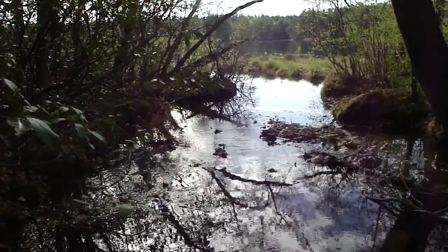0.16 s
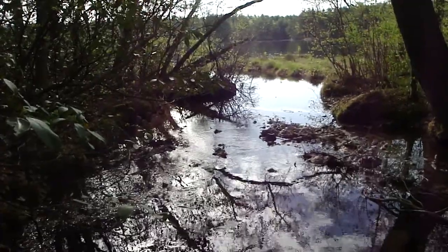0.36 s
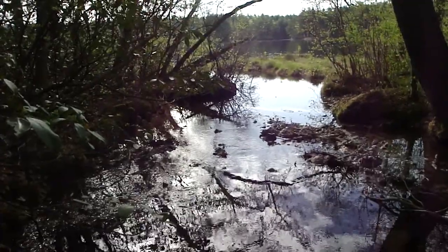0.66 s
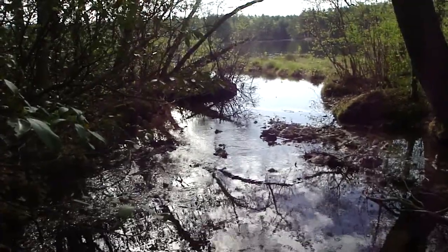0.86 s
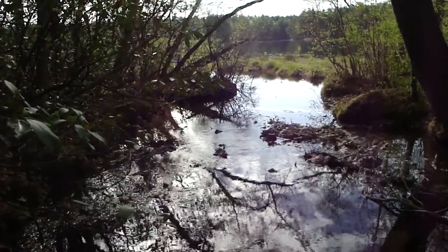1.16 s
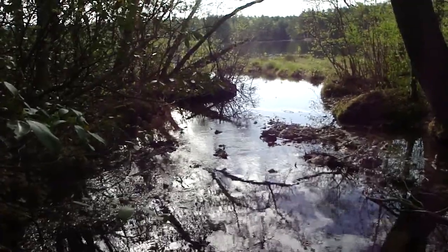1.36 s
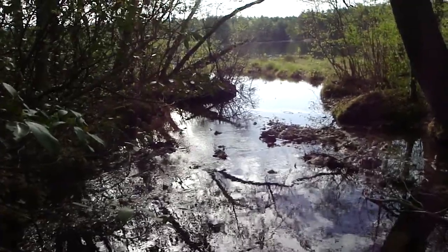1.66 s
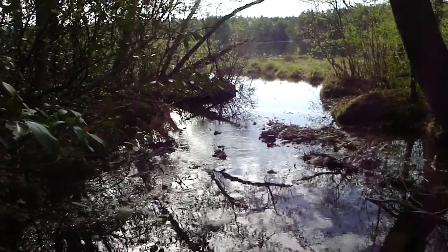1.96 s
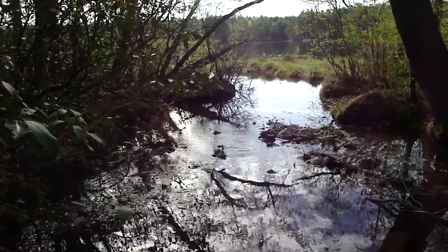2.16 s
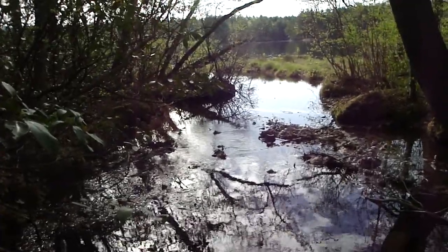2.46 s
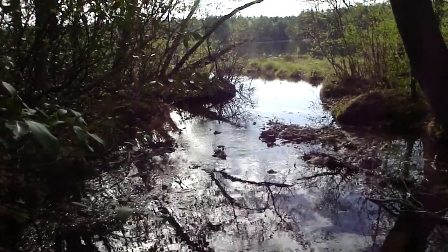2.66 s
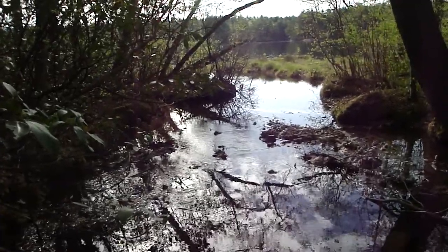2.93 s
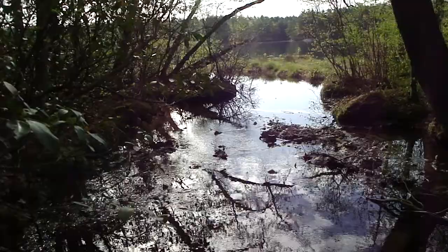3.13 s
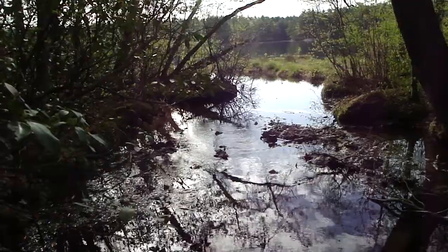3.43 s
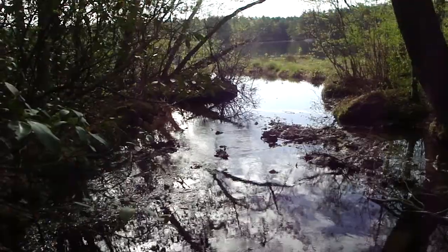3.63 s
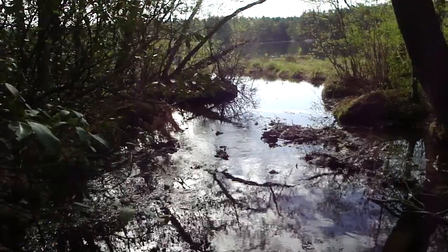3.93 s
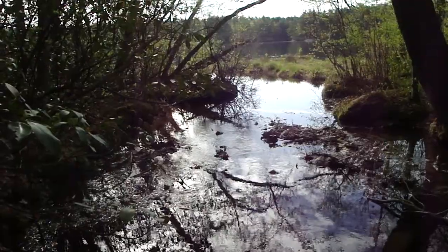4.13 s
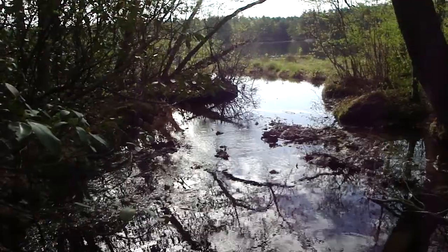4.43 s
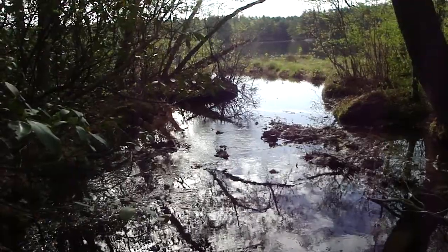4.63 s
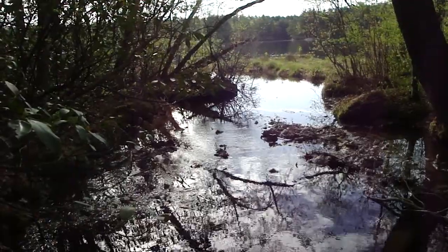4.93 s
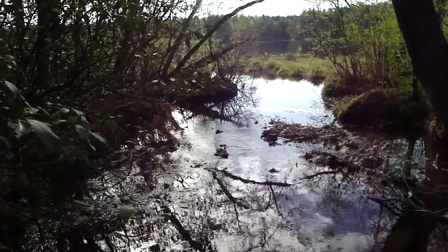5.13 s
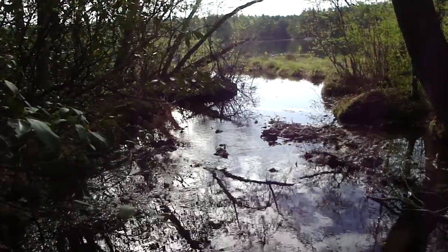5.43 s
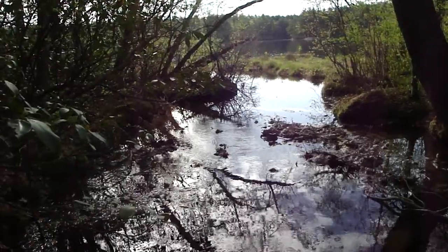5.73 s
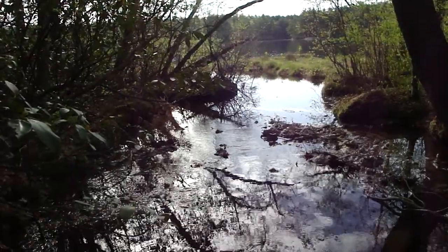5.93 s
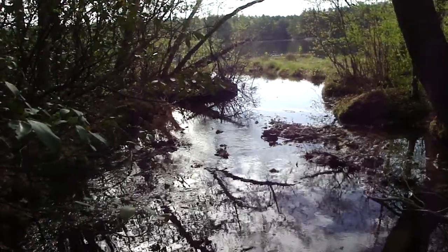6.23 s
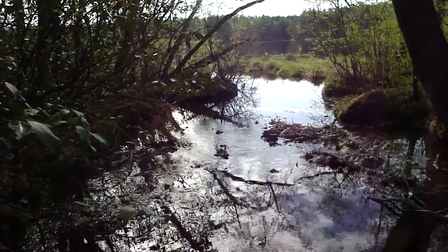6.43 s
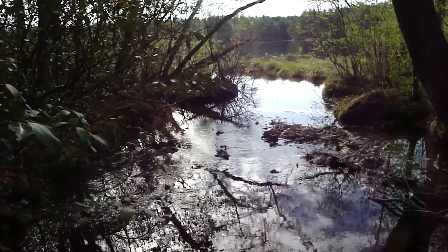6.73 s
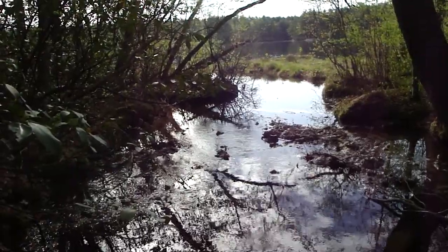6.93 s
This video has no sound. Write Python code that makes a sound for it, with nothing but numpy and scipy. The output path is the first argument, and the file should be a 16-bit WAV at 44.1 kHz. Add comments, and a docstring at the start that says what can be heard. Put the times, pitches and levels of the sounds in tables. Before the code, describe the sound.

A chorus of tree frogs trills continuously around a wooded pond, many overlapping fast pulsing notes blurred by trees. Beneath is a soft airy rush with hiss and faint camera ticks. Distant small birds chirp, buzz and whistle downward, with one raspy song around two seconds. After five seconds the deeper frogs fall away, then the middle ones thin, leaving the high trill. Single fixed camera microphone, mono.

```python
"""Tree frogs trill around a wooded pond from the start, each pulsing one note that the trees smear.
Under them lie a soft outdoor rush with hiss and the camera's faint electrical ticks and whine, all by filtering.
From one second small birds further off whistle and buzz on gliding sines; at two seconds one sings a raspy song.
After five seconds the deep frogs all but drop out, then the middle ones thin; the high ones trill on."""
import sys
import numpy as np
from scipy import signal
from scipy.fft import rfft, irfft, next_fast_len
from scipy.io import wavfile

SR = 44100
rng = np.random.default_rng(int(sys.argv[2]) if len(sys.argv) > 2 else 0)


def generate_wav(sig):
    """Save sig (samples, or channels by samples) to the path in sys.argv[1] as 16-bit PCM at SR."""
    pcm = np.round(np.clip(np.atleast_2d(sig).T, -1, 1) * 32767).astype(np.int16)
    wavfile.write(sys.argv[1], SR, pcm)


N = 312669
T = np.arange(N) / SR
WOODS_T60 = 1.2  # time for a bird's note to fade by 60 dB among the trees [s]


def undb(db):
    """Decibels to gain."""
    return 10 ** (np.asarray(db) / 20)


def unit(x):
    """Scale to rms 1."""
    return x / np.sqrt(np.mean(x ** 2) + 1e-20)


def walk(rate):
    """Slow chance: rate random levels a second joined by lines, spread near 1."""
    levels = rng.standard_normal(8192)
    return 1.2 * np.interp(T * rate, np.arange(8192), levels)


def ramp(start, length):
    """Rise from 0 to 1 over length seconds."""
    return np.clip((T - start) / length, 0, 1)


def tone(hz):
    """A sine that follows a pitch curve."""
    return np.sin(2 * np.pi * np.cumsum(hz) / SR)


def colour(x, points):
    """Filter by a spectrum of (Hz, dB) points, joined along a logarithmic pitch axis."""
    hz, db = np.transpose(points)
    size = next_fast_len(N)
    f = np.maximum(np.arange(size // 2 + 1) * SR / size, 1)
    gain = undb(np.interp(np.log(f), np.log(hz), db))
    return irfft(rfft(x, size) * gain, size)[:N]


def woods(x, t60, wet_db):
    """The direct sound and a fading spray of echoes from trunks and banks."""
    t = T[:SR]
    after_gap = t > .008
    spray = rng.standard_normal(SR) * undb(-60 * t / t60) * after_gap
    echoes = undb(wet_db) * unit(spray) / np.sqrt(SR)
    return x + signal.oaconvolve(x, echoes)[:N]


def add(out, start, sound):
    """Mix a short sound in at its time."""
    i = max(int(start * SR), 0)
    out[i:i + len(sound)] += sound[:N - i]


def air():
    """A soft, far rush that swells very slightly, topped by smooth hiss: filtered noise."""
    # outdoor rush and microphone hiss, relative spectrum: (frequency [Hz], level per Hz [dB])
    air_spectrum = [(20, -18), (38, -28), (58, -8.5), (75, -2.5), (105, 0), (250, -1.5), (420, -1.2),
                    (800, -4.5), (1300, -6.5), (2100, -10), (4000, -13.5), (7000, -17.5), (11000, -21)]
    level_db = -53
    rush = unit(colour(rng.standard_normal(N), air_spectrum))
    swell_db = .15 * walk(2)
    return undb(level_db + swell_db) * rush


def trill(hz, rate, wet_db, pulse_share=0.53, attack=0.53, bend_hz=12, waver_hz=5.513, t60=0.48):
    """One frog: the vocal sac holds a note in quick pulses that start sharply and sag a little in pitch."""
    pulse_rate = rate * (1 + 0.02515 * walk(5))
    cycle = (np.cumsum(pulse_rate) / SR + rng.random()) % 1
    # progress through the sounding part of each cycle; the rest is silent
    within = np.minimum(cycle / pulse_share, 1)
    pulse = np.sin(np.pi * within ** attack) * undb(0.98 * walk(23))
    sag = bend_hz * (1 - 2 * within) * (within < 1)
    pitch = hz + waver_hz * walk(25) + sag
    return unit(woods(pulse * tone(pitch), t60, wet_db))


def chorus(crowd_db=-7, count=4, sac_low_hz=1420, sac_high_hz=1915):
    """Each section is a few near frogs over a crowd of far ones; it thins as its callers stop."""
    # frogs near the microphone, deepest first: (pitch [Hz], pulse rate [1/s])
    near_frogs = [(1462, 24), (1480, 39), (1518, 47), (1532, 27), (1603, 20), (1622, 27), (1641, 27),
                  (1664, 43), (1706, 20), (1774, 19), (1793, 46.5), (1838, 36), (1875, 27)]
    # their relative loudness within a section, in the same order: (level [dB])
    near_levels = [-10.5, -5.5, -2.5, -8.5, -5.5, -1.5, 2, -1.5, 0, 0, -1, 2, 0]
    # the deep, middle and high voices: (lowest pitch [Hz], highest pitch [Hz])
    sections = [(1450, 1555), (1565, 1725), (1760, 1905)]
    # each section's calling: (level ahead of sac filter and mix [dB], callers start to stop [s],
    # time they take to stop [s], level lost [dB])
    calling = [(-50, 4.98, 0.42, 20), (-47, 5.54, 0.21, 10), (-49, 6, .2, .5)]
    build_db_per_s, swell_db = 0.16, 0.63  # shared slow growth; each section's own swell

    out = 0
    for (low, high), (section_db, stop, fade, lost_db) in zip(sections, calling):
        near = sum(undb(db) * trill(hz, rate, wet_db=-4)
                   for (hz, rate), db in zip(near_frogs, near_levels) if low <= hz < high)
        pitches = low + (high - low) * (np.arange(count) + rng.random(count)) / count
        # far frogs reach the microphone with more echo than direct sound
        far = sum(trill(hz, rng.uniform(22, 34), wet_db=4.5, pulse_share=0.41) for hz in pitches)
        effort_db = build_db_per_s * (T - T.mean()) + swell_db * walk(2.93)
        effort_db = effort_db - lost_db * ramp(stop, fade)
        section = unit(unit(near) + undb(crowd_db) * unit(far))
        out = out + section * undb(section_db + effort_db)
    # the vocal sacs radiate only a narrow band
    sac_band = signal.butter(5, [sac_low_hz, sac_high_hz], "band", fs=SR, output="sos")
    return signal.sosfilt(sac_band, out)


def electronics(whine_hz=8720, whine_width_hz=260, whine_db=-76, tick_db=-75):
    """The camera rings faintly twice a frame, a whine and a tick, with louder ticks in short runs."""
    # what a tick rings with: (frequency [Hz], width [Hz], relative level [dB])
    tick_modes = [(5830, 250, 13), (6100, 400, -10.5), (6830, 400, 9.5), (8700, 710, -32)]
    # louder ticks, one a frame: (time [s], ticks [count], peak level [dB])
    tick_runs = [(.434, 1, -43), (.568, 3, -41.5), (1.369, 1, -45.5), (1.502, 2, -47), (1.569, 1, -42),
                 (2.103, 1, -46.5), (2.269, 3, -40.5), (2.503, 1, -43), (4.338, 1, -40.5)]
    frame_hz = 29.97

    t = T[:SR // 100]
    # neighbouring modes swing against each other, which keeps the tick thin
    tick = sum((-1) ** k * undb(db) * np.exp(-np.pi * width * t) * np.sin(2 * np.pi * hz * t)
               for k, (hz, width, db) in enumerate(tick_modes))
    whine = np.exp(-np.pi * whine_width_hz * t) * np.sin(2 * np.pi * whine_hz * t)
    beat = np.diff(np.floor(T * 2 * frame_hz), prepend=0)  # one impulse each half frame
    whines = signal.oaconvolve(beat * undb(2 * walk(30)), whine)[:N]
    ticks = signal.oaconvolve(beat * undb(2.1 * walk(30)), tick)[:N]
    out = undb(whine_db) * unit(whines) + undb(tick_db) * unit(ticks)
    out *= undb(np.interp(T, [4.1, 4.4], [0, -7]))  # this steady buzz recedes
    for start, count, db in tick_runs:
        for k in range(round(count)):
            add(out, start + k / frame_hz, undb(db) * tick / np.abs(tick).max())
    return out


def far_birds():
    """Slurs that swell as they settle on their last pitch; a fast flutter of pitch makes some of them buzz."""
    # short notes: (time [s], length [s], first pitch [Hz], last pitch [Hz], direct level [dB],
    # buzz depth [Hz])
    notes = [(1.027, .02, 5700, 5770, -59, 22), (1.054, .02, 5730, 5770, -57, 22),
             (1.96, .17, 4380, 4120, -60, 66), (2.33, 0.1, 5880, 5760, -63, 53),
             (2.39, .1, 4920, 4450, -63, 290), (2.546, 0.08, 4080, 4150, -60.5, 70),
             (4.29, .1, 4280, 4190, -62, 62), (5.21, 0.13, 3870, 3900, -61, 38),
             (5.46, 0.15, 2330, 2465, -57, 11)]
    out = np.zeros(N)
    for start, length, first_hz, last_hz, db, buzz_hz in notes:
        u = np.linspace(0, 1, int(length * SR))
        glide = last_hz + (first_hz - last_hz) * (1 - u) ** 2
        pitch = glide + buzz_hz * walk(407)[:len(u)]
        swell = signal.windows.tukey(len(u), .35) * undb(-7 * (1 - u) ** 2)
        add(out, start, undb(db) * swell * tone(pitch))
    return woods(out, t60=WOODS_T60, wet_db=-6.5)


def whistler(waver_hz=14):
    """A near-pure tone slides down, with a softer voice below and an echo from across the pond."""
    # falling whistles: (time [s], length [s], direct level [dB], pitch shift [Hz],
    # lower second voice against the first [dB])
    whistles = [(1.039, 0.18, -59, -50, -20), (2.05, .24, -61, -20, -13), (4.096, 0.3, -51.3, -0.5, -10.5),
                (5.114, 0.314, -51, -5, -13.5), (5.73, 0.25, -54.5, -50, -16)]
    # both voices settle from a first pitch to a resting pitch, the second sooner
    first_hz, first_rest_hz, first_settle_s = 3716, 3194, .15
    second_hz, second_rest_hz, second_settle_s = 2866, 2543, .055
    # the first voice of the longest whistles hooks down at its end
    hook_after_s, hook_hz, hook_s = .304, 300, 0.0161
    # loudest midway, with softer shoulders
    peak_after_s, peak_width_s, shoulder_db = 0.15, 0.056, -8
    # the forest edge across the pond sends it back, blurred
    echo_s, echo_db = .28, -14.5

    out, echo = np.zeros(N), np.zeros(N)
    for start, length, db, shift_hz, second_db in whistles:
        t = T[:int(length * SR)]
        waver = shift_hz + waver_hz * walk(152)[:len(t)]
        hook = hook_hz * np.exp(np.minimum((t - hook_after_s) / hook_s, 1))
        first = first_rest_hz + (first_hz - first_rest_hz) * np.exp(-t / first_settle_s) - hook
        second = second_rest_hz + (second_hz - second_rest_hz) * np.exp(-t / second_settle_s)
        swell = undb(shoulder_db * (1 - np.exp(-((t - peak_after_s) / peak_width_s) ** 2)))
        voices = swell * tone(first + waver) + undb(second_db) * tone(second + waver)
        call = undb(db) * signal.windows.tukey(len(t), .08) * voices
        add(out, start, call)
        add(echo, start + echo_s, undb(echo_db) * call)
    return woods(out, t60=WOODS_T60, wet_db=-5) + woods(echo, t60=WOODS_T60, wet_db=2.5)


def raspy_song():
    """A far voice swells once, fluttering wildly, then rises and narrows to a wheeze; the trees blur it."""
    start_s, attack_s, hold_s, release_s = 2.1, 0.39, 0.23, 0.34
    level_db = -60.5  # direct sound at full swell
    rasp_hz, rasp_flutter_hz = 5270, 618
    wheeze_hz, wheeze_flutter_hz = 6480, 170
    rise_after_s, rise_s = .5, .27

    rise = ramp(start_s + rise_after_s, rise_s)
    flutter_hz = rasp_flutter_hz + (wheeze_flutter_hz - rasp_flutter_hz) * rise
    pitch = rasp_hz + (wheeze_hz - rasp_hz) * rise + flutter_hz * walk(500)
    swell = ramp(start_s, attack_s) - ramp(start_s + attack_s + hold_s, release_s)
    return woods(undb(level_db) * swell * tone(pitch), t60=0.6, wet_db=0.5)


def scene():
    """Frogs, birds, air and electronics on one microphone."""
    frogs = undb(-0.58) * chorus()
    birds = far_birds() + whistler() + raspy_song()
    return (air() + frogs + electronics() + birds)[None]


def record(dry):
    """The camera cuts the top steeply."""
    top_hz = 10950
    steep_cut = signal.ellip(12, .1, 70, top_hz, fs=SR, output="sos")
    return signal.sosfilt(steep_cut, dry)


dry = scene()
out = record(dry)
generate_wav(out)
```